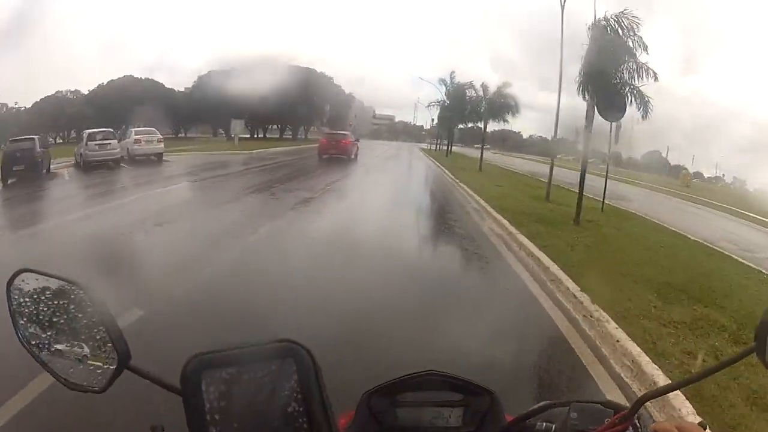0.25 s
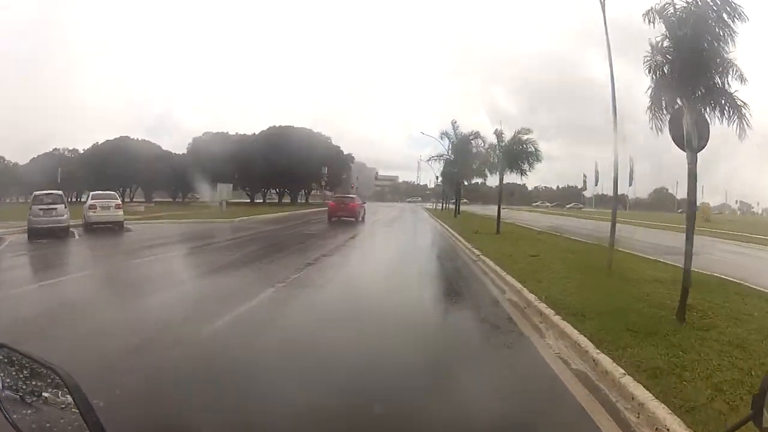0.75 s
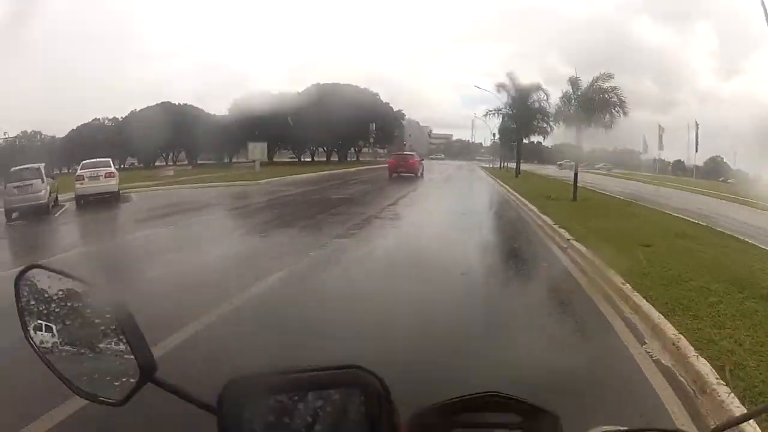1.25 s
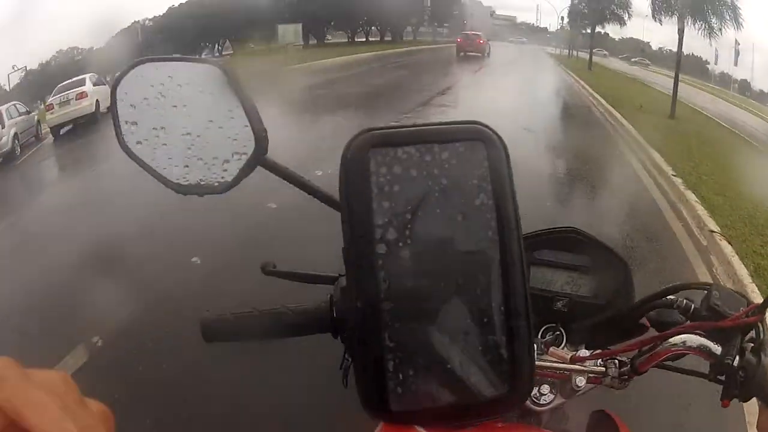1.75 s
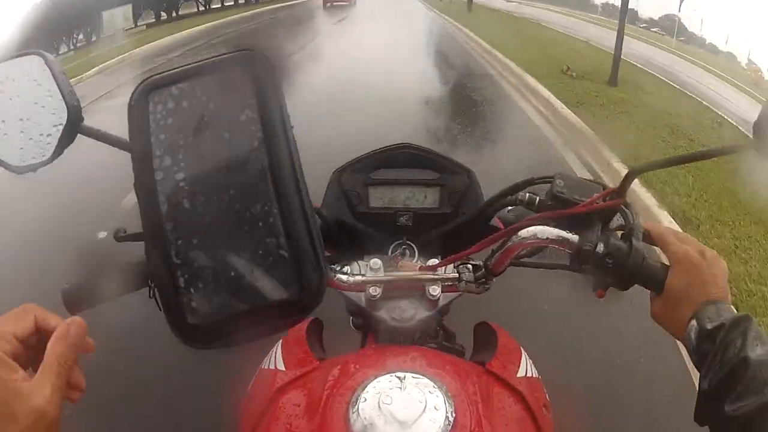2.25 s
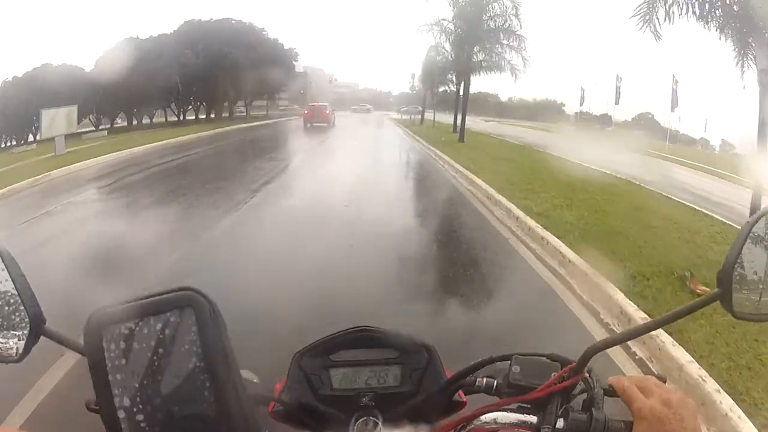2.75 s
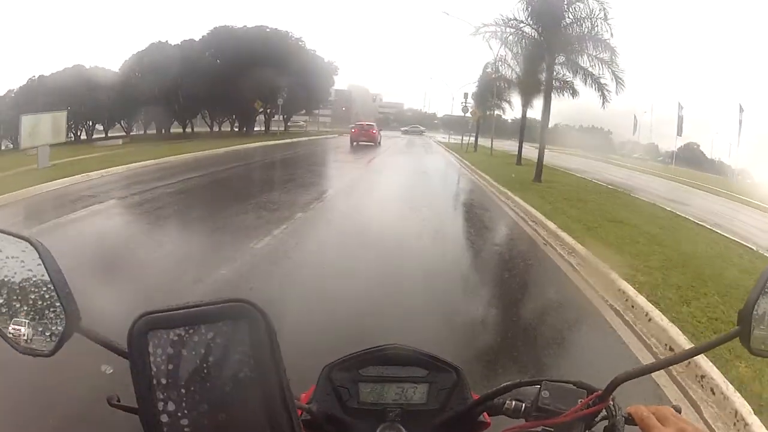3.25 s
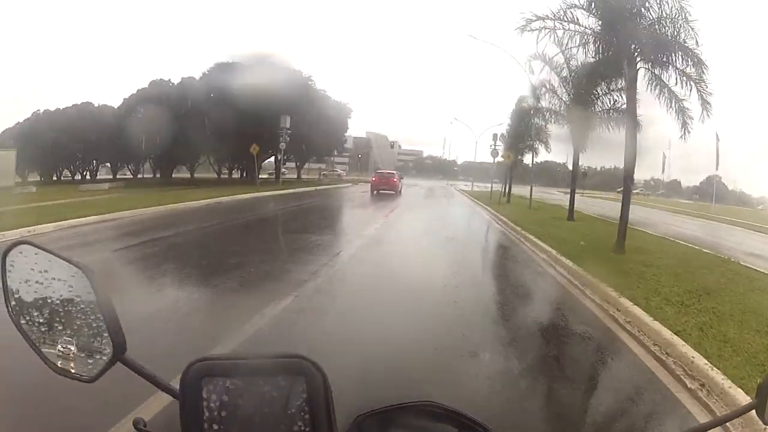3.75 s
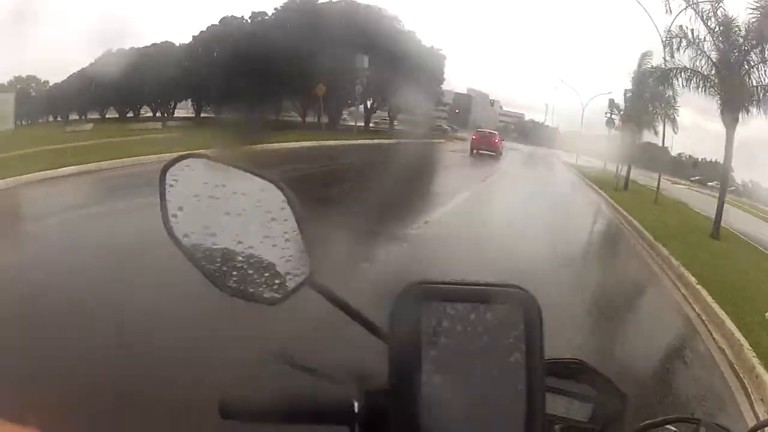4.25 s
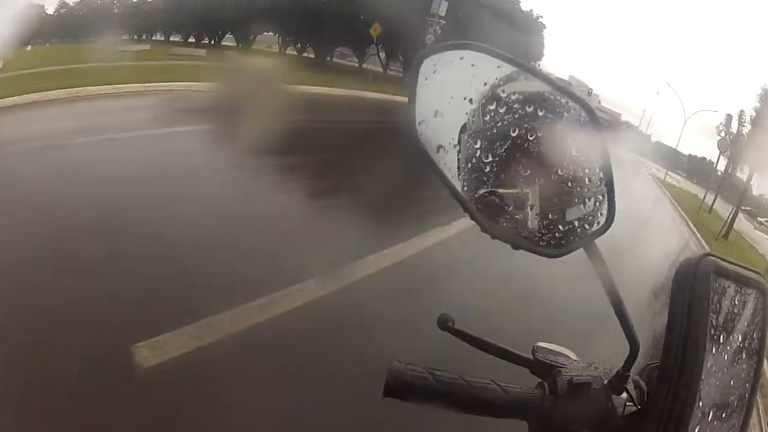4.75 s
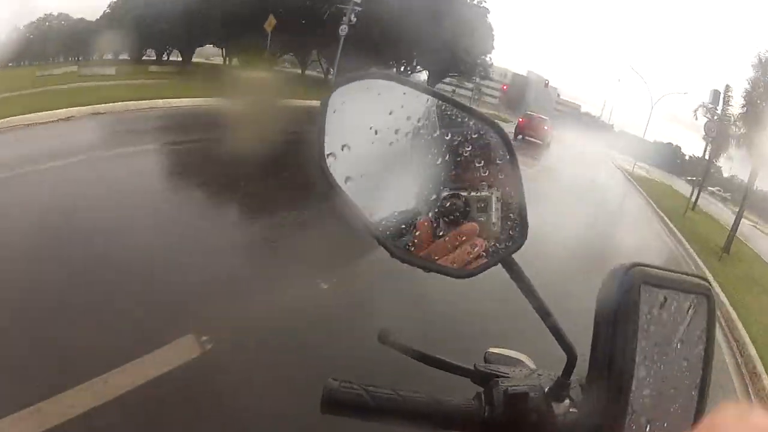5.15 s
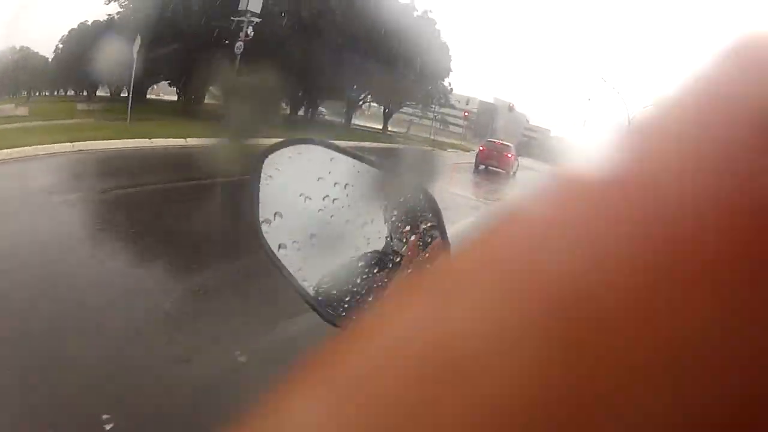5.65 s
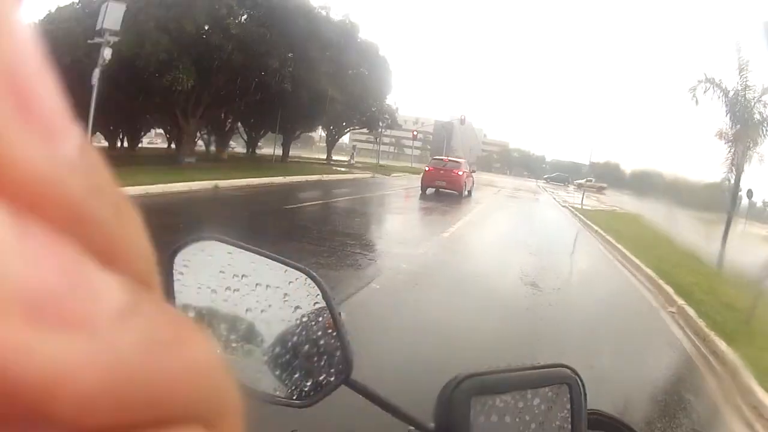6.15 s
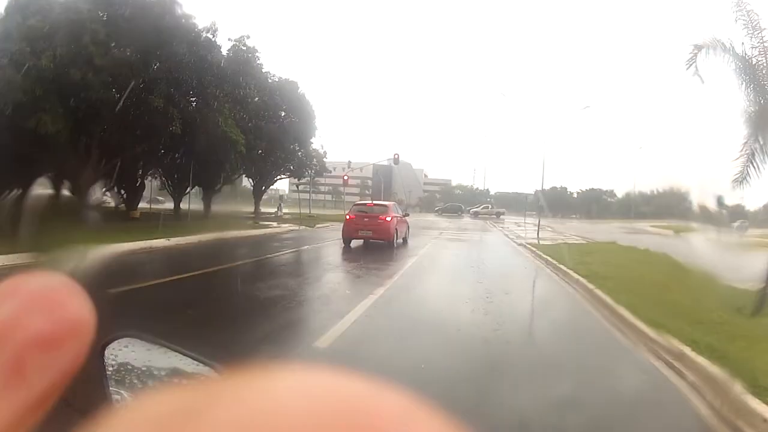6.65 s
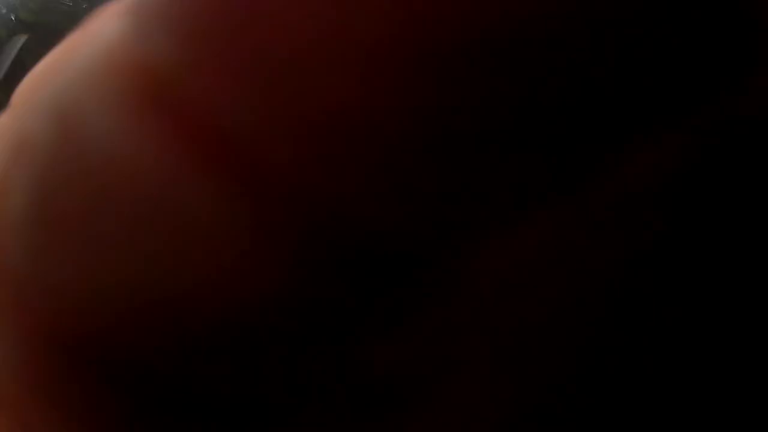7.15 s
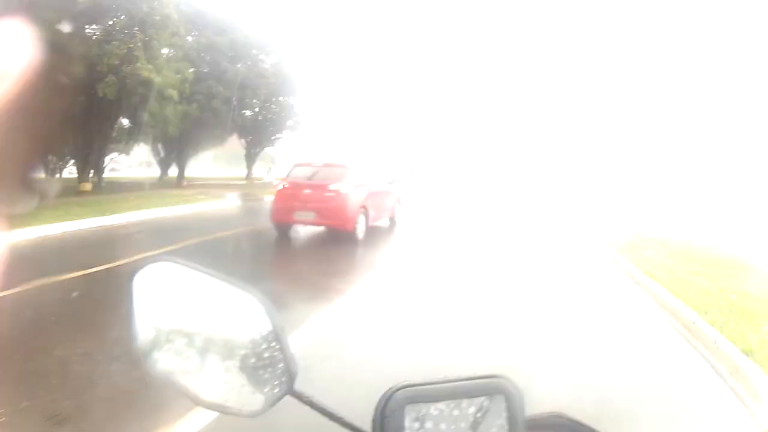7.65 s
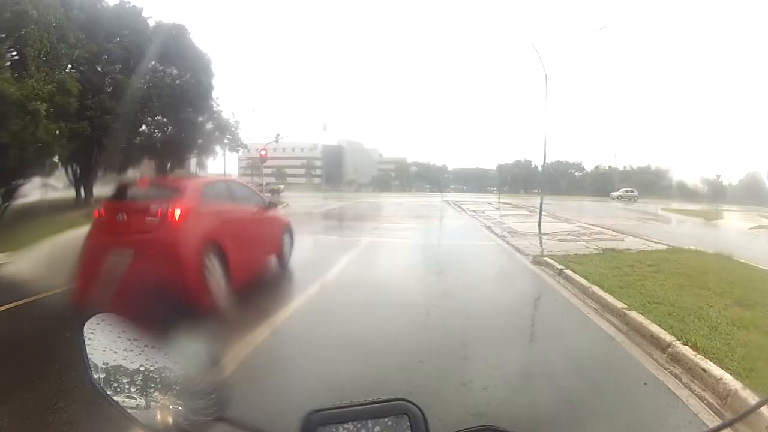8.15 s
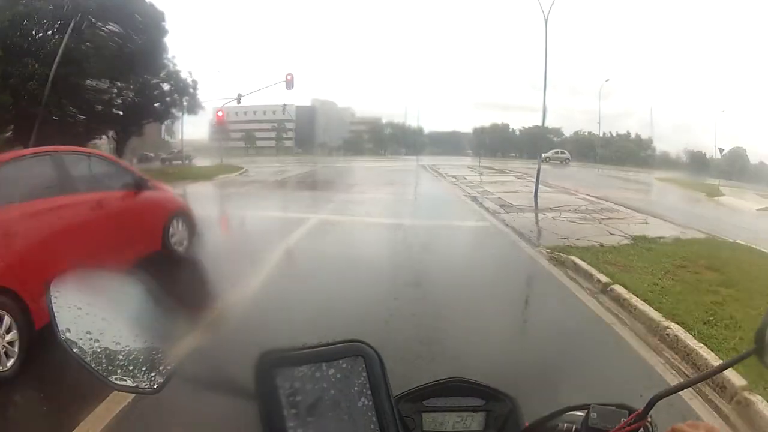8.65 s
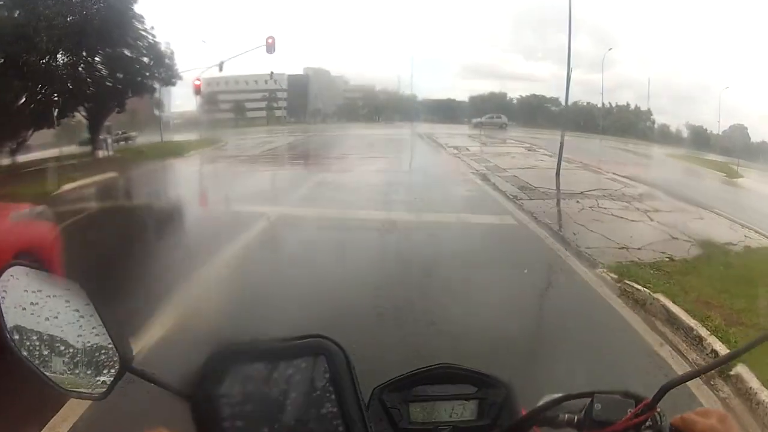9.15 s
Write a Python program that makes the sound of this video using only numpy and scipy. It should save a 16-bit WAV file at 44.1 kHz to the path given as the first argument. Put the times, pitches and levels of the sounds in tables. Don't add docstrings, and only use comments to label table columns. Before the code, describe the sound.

Boxy, close rain knocks on a sealed housing over muffled road wash and low wind; a wet finger rubs hard, then brakes squeal thinly.

```python
import sys
import numpy as np
from scipy import signal
from scipy.fft import rfft, irfft, next_fast_len
from scipy.io import wavfile
from scipy.ndimage import uniform_filter1d

SR = 44100
rng = np.random.default_rng(int(sys.argv[2]) if len(sys.argv) > 2 else 0)


def volts(x):
    e = np.asarray(x, float) / 20
    return 10 ** e


def output_pcm(signal):
    pcm = np.clip(np.atleast_2d(signal).T, -1, 1) * 32767
    wavfile.write(sys.argv[1], SR, np.round(pcm).astype(np.int16))


N = 414099

# (time [s], level [dB])
HISS = [(0.0, -48.5), (2.12, -48), (3.24, -46), (7.5, -48.5), (7.71, -52), (9.39, -55)]
# (frequency [Hz], width [Hz], level [dB])
HISS_PEAKS = [(630, 440, -36), (998, 26, -7), (1331, 91, 5), (1847, 260, 0.5), (2405, 320, -1.5),
              (2770, 910, -12.5), (3640, 160, -4), (4700, 1200, -30), (5400, 900, -66)]
# (time [s], level [dB])
WIND = [(0, -37.5), (.9, -52.5), (1.3, -50), (1.45, -53.5), (2.8, -54), (3.5, -50), (4.3, -50.5),
        (4.75, -53.5), (4.85, -46), (5.1, -50), (7.5, -52), (7.65, -51), (8.5, -58), (9.39, -61.5)]
DEEP_DB = 1.5
SELF_NOISE_DB = -63

# (frequency [Hz], level [dB], t60 [s])
HOLLOW = [(420, -19, .015), (650, -2, .024), (820, -5, .018), (990, 0, .022)]
DOOR = [(1265, 0, .024)]
WALLS = [(1680, -5, .013), (1900, -5, .012), (2280, -2, .013), (2460, 0, .011), (2820, -4, .01)]
BRIGHT = [(3350, -3, .009), (3680, -1, .009), (4200, -10, .007), (4700, -11, .008), (5300, -17, .006)]

# (centre time [s], peak [dB], frequency [Hz])
BUFFETS = [(.01, -13, 85), (0.175, -20.5, 199), (0.18, -26, 83), (.278, -21, 198), (.485, -25.5, 63.6),
           (0.514, -30, 81), (0.552, -29.5, 153), (0.933, -24.5, 151), (1.088, -19.5, 90), (1.25, -32, 25),
           (1.299, -26.5, 25), (3.287, -30.5, 190), (3.391, -27, 53), (3.644, -32, 35), (3.757, -31, 40.8),
           (3.825, -32, 27.6), (3.998, -33.5, 203), (4.111, -31, 126), (4.158, -31, 122),
           (4.478, -30, 54.4), (5.384, -29, 274), (6.325, -32.5, 54.3), (6.821, -29, 27.8),
           (6.833, -28.5, 164), (8.98, -32.5, 203)]
# (centre time [s], peak [dB], frequency [Hz])
THUMPS = [(0.375, 6.5, 137), (.654, -27, 290), (.803, -16, 286), (0.874, -16, 156), (1.3617, -7, 320),
          (2.109, -35.5, 236), (3.547, -20.5, 219), (3.954, -25, 118), (4.8703, -3.5, 182),
          (5.86, -30, 287), (5.988, -29, 298), (6.177, -23.5, 280), (6.533, -31.5, 234),
          (6.651, -26.5, 294), (8.283, -34.5, 196), (9.138, -26.5, 227), (4.216, -28, 352),
          (9.137, -37, 80.4)]
# (centre time [s],
# peak [dB], frequency [Hz])
BUMPS = [(0.29, -21, 84.6), (0.342, -21, 94), (.82, -17, 187), (.841, -25.5, 68), (0.903, -22, 56),
         (4.924, -20.5, 131), (4.97, -31, 104), (5.747, -13.5, 70), (5.77, -10, 160), (5.786, -12, 43.8),
         (5.801, -14, 282), (6.069, -13.5, 170), (6.107, -23, 120), (6.723, -13.5, 108), (6.736, -15, 34.3),
         (6.754, -21, 59), (7.569, -22.5, 189), (7.63, -27.5, 103), (7.596, -24, 213), (.81, -22, 330),
         (0.831, -23, 170), (.869, -21, 201), (4.89, -13.5, 110)]

# (time [s], peak [dB], hollow knock re peak [dB], bright tick re peak [dB], hollow tilt [dB per octave])
KNOCKS = [(.374, 3.5, 3, 0.5, -0.5), (0.8, -14.5, 5, -21, -4), (0.8742, -31, 7, -19, -17),
          (1.361, 4.5, -16, -8, -18), (2.098, -44, 3, -24, -4), (2.3168, -25.5, 0, 1.5, 49),
          (3.047, -41, 15.5, -22, 43), (3.232, -12.5, -1.5, 3.5, 42), (6.6497, -8, -20, 5.5, -4),
          (4.2135, -11.5, -8.5, -2, 9), (3.541, -18.5, 1, 3.5, -7), (3.9454, -20, -2.5, -2.5, 23),
          (4.869, -9, 9, 4.5, 12), (5.7628, -18, 2.5, -11, 3), (6.042, -18.5, -5, -29, 0),
          (7.1299, -16, -22.5, -1, 3), (7.586, -30.5, 7, -10, -10), (8.277, -44, 7, -22, -2)]
# (time [s], peak [dB], door ring re peak [dB], bright tick re peak [dB])
LENS_DROPS = [(0.0309, -13, -10.5, 1.5), (0.194, -20.5, -17, -4), (0.7719, -17.5, -5.5, -5.5),
              (1.4064, -12.5, -13.5, -10), (1.7518, -13.5, -12, -6), (1.7687, -20, -16, -2),
              (2.3304, -20.5, -19, -8.5), (2.4853, -30, -2.5, -8), (3.6557, -22, -15.5, 0),
              (3.8877, -17.5, -33, -1.5), (4.7015, -22.5, -16.5, -6.5), (4.7672, -15, -20, -6.5),
              (4.801, -22.5, -12, -7), (4.834, -25, -15, -4), (5.1029, -14.5, -13, -1.5),
              (5.239, -14, -14, -41), (5.6968, -9.5, -26, -11), (5.996, -18, -13.5, -4),
              (6.1762, -9, -12, 1.5), (6.4306, -20.5, -16, -6.5), (8.0089, -21, -8, -8.5),
              (8.1404, -12, -21.5, -8), (8.9434, -12.5, -17, -11), (9.2045, -27, -12, -1.5),
              (9.138, -11, -14.5, -6.5)]
# (time [s], peak [dB], door ring re peak
# [dB], bright tick re peak [dB])
TOP_DROPS = [(0.3005, -9, -14, -2), (0.6515, -11, -15.5, -2), (0.838, -11, -12, 1.5),
             (0.9886, -15, -18.5, -5.5), (1.1321, -17, -18, -8.5), (1.6587, -24.5, -25, -13),
             (1.699, -20.5, -14, -5.5), (2.8722, -15, -10.5, -4.5), (2.881, -12, -17.5, -10),
             (3.2286, -12, -6, -33), (3.3132, -17, -12, -7), (3.8107, -17, -13, 1.5),
             (4.076, -25.5, -10.5, -1.5), (5.319, -24, -10.5, -6), (6.1653, -20, -3.5, -8),
             (6.5303, -22.5, -10, -12), (7.5721, -21.5, -12, -5), (7.6146, -22, -19, -0.5)]
# (time [s], peak [dB], door ring re peak [dB], bright tick re peak [dB])
MOUNT_DROPS = [(0.7125, -26.5, -6, -9), (1.181, -28.5, -0.5, -12), (2.0936, -32, -1.5, -17),
               (2.16, -38, -26, -16), (2.4067, -35.5, -28, -3), (2.9313, -26.5, -24, -20),
               (3.3294, -43, -14, -15), (4.3247, -16, -15, -28), (4.4968, -23, -22, -18),
               (5.1735, -26.5, -13, -16), (5.2277, -21.5, -24, -1), (5.7145, -10, -20, -18),
               (5.8595, -9.5, -15.5, -39), (6.9292, -29.5, -14, -11), (7.126, -21, -9, -21),
               (7.547, -29.5, -17, -15), (8.3405, -21.5, -24, -11), (9.1828, -23.5, -20, -23)]
SPOT_HOLLOW_DB = [-25, -24, -25]
DOOR_DB, TICK_DB = 7, 6
# (time [s], peak [dB])
VISOR_SPLATS = [(0.5174, -32), (0.57, -27.5), (0.6675, -28), (0.7345, -30), (1.4416, -26), (1.552, -30.5),
                (2.013, -55), (2.2482, -31.5), (2.7828, -28), (2.983, -28), (3.045, -35.5), (3.12, -29),
                (3.4392, -33), (3.692, -30), (3.91, -35), (5.0285, -26.5), (5.544, -27.5), (5.5772, -34.5),
                (5.821, -36), (5.965, -33.5), (6.5675, -27), (6.596, -37), (6.7168, -35.5), (7.8297, -35),
                (8.0904, -35), (8.7603, -32.5), (9.097, -32)]
# (time [s], peak [dB])
SHELL_SPLATS = [(0.155, -42), (0.168, -34), (0.753, -36), (.797, -39), (0.857, -42), (1.27, -38.5),
                (1.469, -29.5), (1.582, -33.5), (1.736, -41), (1.805, -42), (1.8974, -35), (2.203, -31),
                (3.0575, -38.5), (3.154, -33), (3.5194, -26.5), (3.572, -32.5), (4.906, -23), (4.9699, -36),
                (5.073, -34), (5.119, -33.5), (5.189, -33), (5.5599, -30.5), (5.745, -29.5), (5.81, -31.5),
                (5.914, -34.5), (6.78, -64), (6.858, -47), (6.968, -29.5), (6.984, -28), (6.999, -28.5),
                (7.032, -30.5), (7.077, -27.5), (7.9847, -35.5), (8.106, -31.5), (8.191, -34),
                (9.004, -32.5)]
# (time [s], peak [dB])
BACK_SPLATS = [(.006, -24.5), (0.283, -29), (0.398, -41), (0.542, -32), (1.094, -35.5), (2.219, -31),
               (2.7084, -37), (2.8123, -34), (3.279, -32), (3.475, -32.5), (3.748, -31.5), (3.78, -25.5),
               (3.8443, -28), (3.898, -35), (3.988, -35), (4.114, -30), (4.276, -32), (4.739, -35),
               (4.7532, -33), (5.381, -35.5), (5.424, -34), (5.483, -38), (5.985, -37), (6.206, -42),
               (6.458, -49), (6.5206, -34), (6.627, -34.5), (7.101, -47), (7.3446, -35), (8.279, -57)]
# (bright tick re peak [dB], spreading time [ms])
SPLAT_KIND = [(3, 1.9), (-10, 3.2), (-19, 3.2)]

# (time [s], peak [dB], bright tick re peak [dB])
PATTER = [(0.108, -35, -15), (0.155, -28.5, -22), (0.24, -34, -16.0), (0.33, -31, -22.0),
          (0.35, -31.5, -18.0), (0.398, -25, -24), (0.693, -41, -10.0), (0.932, -39, -16),
          (1.034, -46, -16.0), (1.332, -42, -13.0), (1.498, -34.0, -11), (1.567, -40, -16), (1.737, -30, 1),
          (1.958, -35, -7), (2.01, -31, -21), (2.195, -41, -18.0), (2.415, -40, -3), (2.513, -39, -6),
          (2.615, -32.5, -8), (2.676, -45, -9), (2.709, -32, -19), (2.952, -38, -10.0), (3.189, -36.5, 8.5),
          (3.367, -37, -10), (3.681, -33.0, -11.0), (4.15, -30.5, -4), (4.344, -43, -10.0),
          (4.384, -44, -14), (4.824, -31, -12.0), (4.944, -40, -6), (5.212, -32.0, -7), (5.256, -30.5, -11),
          (5.442, -32, -14.0), (5.799, -30, -12), (5.914, -39, -13), (6.359, -41, -13), (6.416, -34, -16),
          (6.46, -30.5, -24), (6.51, -49, -14.0), (6.782, -29, -15), (6.872, -45, -13), (7.093, -37, -16.0),
          (7.102, -35, -18.0), (7.284, -38.5, -12), (7.331, -36.0, -10.0), (7.651, -39, -10),
          (8.275, -30.5, -17), (8.449, -37.5, -7), (8.731, -36.5, -13.5), (8.802, -41, -18),
          (9.381, -33, -18)]
# (time [s], peak [dB], bright tick re peak [dB])
MORE_PATTER = [(0.29, -42, -22), (.49, -37, -12), (7.975, -36, -14), (7.992, -43, -16), (8.152, -28.5, -14),
               (8.178, -32, -14), (8.201, -32.5, -18), (1.193, -33, -8), (8.611, -37, -1.5), (8.84, -36, -3),
               (3.213, -33, -18), (3.262, -36, -14), (2.151, -45, -14), (2.76, -41, -16), (6.821, -40, -21)]
PATTER_MS = 2
# (time [s], level [dB])
RUNOFF = [(0.38, -14), (.803, -22.5), (.871, -27), (3.544, -33), (4.873, -27), (7.585, -32), (7.618, -35.5)]
RUNOFF_T60_S = 0.073

# (time [s], slip rate [per s], wall swing [dB], rasp [dB])
WIPES = [
    [(6.0495, 414, -18.5, -9), (6.06, 397, -20.5, -12.5), (6.068, 225, -22, -16), (6.076, 257, -21, -15.5),
     (6.081, 354, -16, -13), (6.097, 330, -20, -14), (6.103, 290, -15.5, -18.5), (6.11, 400, -23.5, -15),
     (6.162, 570, -65, -28)],
    [(6.9597, 210, -30, -58), (6.975, 230, -37, -46), (6.985, 192, -31, -40), (7.005, 225, -29.5, -38),
     (7.015, 164, -27.5, -60), (7.028, 163, -25.5, -34), (7.038, 380, -39, -44)],
    [(7.1205, 120, -21, -46), (7.146, 109, -17, -29), (7.165, 114.5, -9.5, -20.5), (7.195, 129, -2.5, -19),
     (7.203, 212, -4, -23), (7.218, 210, -7.5, -24.5), (7.232, 164, -11, -31.5), (7.256, 250, -34, -40)],
    [(7.358, 315, -31, -38), (7.378, 277, -21, -37), (7.382, 190, -14.5, -16.5), (7.392, 230, -11.5, -12),
     (7.403, 170, -9, -12), (7.411, 140, -8, -11), (7.42, 130, -16, -30)],
    [(7.4225, 176, -7, -3), (7.437, 213, -5, -13.5), (7.455, 179, -5, -9.5), (7.474, 160, -7, -15.5),
     (7.482, 204, -9, -15), (7.497, 260, -17, -25), (7.505, 208, -18.5, -26.5), (7.535, 230, -41, -62)],
]
# (frequency [Hz], level under fingertip [dB], level under pad [dB], t60 [s])
RASP = [(734, 2.5, -12, 0.015), (1000, 3, -1.5, 0.025), (1304, 0, 4.5, 0.014), (1614, 2.5, -2.5, 0.0093),
        (1865, -8, -4, 0.012), (2476, -2, 0.5, 0.0086), (2915, -3, -12.5, 0.019),
        (4800, -6.5, -7.5, 0.0035)]
LEAN = [.6, -.3, -.02, -.8, -.8]
BACK_SLIP = [0.39, 0.38, 0.61, 0.34, 0.58]
DAMPING = 0.78

# (time [s], frequency [Hz], level [dB])
SQUEAL = [(8.918, 3540, -58), (8.938, 3504, -29.5), (8.97, 3550, -34), (9.005, 3554, -22),
          (9.045, 3560, -41), (9.062, 3730, -19.5), (9.085, 3736, -16), (9.095, 3900, -31),
          (9.135, 3850, -44)]
# (time [s], length [s], start frequency [Hz], end frequency [Hz], level [dB])
GRABS = [(9.09, 0.065, 3610, 3660, -33.5), (9.157, 0.097, 3800, 3760, -50.5),
         (9.142, 0.054, 4740, 4740, -40), (9.195, 0.067, 4770, 4700, -48), (9.26, 0.019, 4750, 4850, -47.5),
         (9.281, 0.03, 3660, 3470, -40.5), (9.302, 0.039, 4750, 4700, -61)]
GRAB_EDGE, GRAB_EDGE_DB = 0.24, -9

HOLD_HZ = 12000
GATE_DB, GATE_HZ = -40, 1050


def rms_one(x):
    return x / np.sqrt(np.mean(x ** 2) + 1e-20)


def peak_one(rows):
    return rows / np.abs(rows).max(axis=1, keepdims=True)


def band(x, low_hz, high_hz):
    return signal.sosfilt(signal.butter(2, [low_hz, high_hz], "band", fs=SR, output="sos"), x)


def drift(rate, size=N):
    r = np.exp(-2 * np.pi * rate / SR)
    noise = rng.standard_normal(size + SR)
    return rms_one(signal.lfilter([1], [1, -2 * r, r * r], noise)[SR:])


def fader(table):
    s, level_db = np.transpose(table)
    return volts(np.interp(np.arange(N) / SR, s, level_db))


def ring(x, hz, t60):
    r, w = volts(-60 / (t60 * SR)), 2 * np.pi * hz / SR
    return signal.lfilter([0, np.sin(w)], [1, -2 * r * np.cos(w), r * r], x + 1e-18)


def strike(x, modes):
    return sum(volts(db) * ring(x, hz, t60) for hz, db, t60 in modes)


def glide(rows):
    s, *columns = np.transpose(rows)
    t = np.arange(s[0], min(s[-1], (N - 1) / SR), 1 / SR)
    fade = np.clip(np.minimum(t - t[0], t[-1] - t) / 0.0032, 0, 1)
    return int(s[0] * SR), [np.interp(t, s, c) for c in columns], fade


def place(s, rows):
    out = np.zeros(N + 2 * rows.shape[1])
    start = (s * SR).astype(int) % len(out)
    np.add.at(out, start + np.arange(rows.shape[1]), rows)
    return out[:N]


def splash(s, splash_ms, levels_db, slap_db, tilt_db):
    ms = np.arange(2048) / SR * 1e3
    luck = rng.standard_normal((len(s), len(ms) + 20))
    spread = ms / (splash_ms * volts(1.5 * np.clip(luck[:, -1:], -1.5, 1.5)))
    push = luck[:, :len(ms)] * np.exp(-spread ** 0.78) * np.clip(ms / 0.18, 0, 1)
    hit = volts(levels_db[0] + slap_db) * peak_one(band(band(push, 1530, 3160), 1390, 3410))
    z = np.exp(-2j * np.pi * np.arange(1025) / 2048)
    # modes, shift of pitch with the spot, top of the band [Hz], tilt
    groups = [(WALLS, .025, 3300, 0), (BRIGHT, .02, 4800, 0), (HOLLOW, .015, 1300, tilt_db), (DOOR, .012, 3000, 0)]
    for level_db, (modes, shift, top_hz, tilt) in zip(levels_db, groups):
        sound = 0
        for k, (hz, db, t60) in enumerate(modes):
            r = volts(-60 / (t60 * SR))
            w = 2 * np.pi * hz / SR * (1 + shift * luck[:, [-2 - k]])
            resonance = (1 - z * z) / (1 - 2 * r * np.cos(w) * z + r * r * z * z)
            rung = irfft(rfft(push) * resonance)
            mode_db = db + tilt * np.log2(hz / 800) + 2 * luck[:, [-10 - k]]
            sound = sound + volts(mode_db) * peak_one(rung)
        hit = hit + volts(level_db) * peak_one(band(sound, max(top_hz / 5, 450), top_hz))
    return place(s, hit)


def hiss(per_s=250):
    wash, spray_db = 0, 1.8 * drift(40)
    for hz, width, db in HISS_PEAKS:
        r = np.exp(-np.pi * width / SR)
        poles = [1, -2 * r * np.cos(2 * np.pi * hz / SR), r * r]
        peak = signal.lfilter([1, 0, -1], poles, rng.standard_normal(N))
        wash = wash + (1 - r * r) * volts(db + spray_db + 3.95 * drift(35.0)) * peak
    born = (rng.random(N) < per_s / SR) * volts(5.5 * np.minimum(rng.exponential(1, N), 3))
    splashes = signal.lfilter([1], [1, -np.exp(-1 / (0.007 * SR))], born) * rng.standard_normal(N)
    fine_rain = strike(splashes, DOOR + WALLS) + volts(-54.0) * strike(splashes, BRIGHT)
    return fader(HISS) * rms_one(rms_one(wash) + 0.45 * rms_one(fine_rain))


def wind(lumpy_db=-0.5):
    deep = rms_one(band(rng.standard_normal(N), 5.2, 38) * volts(lumpy_db * drift(25)))
    flutter = band(band(rng.standard_normal(N), 56, 262), 62, 263)
    flutter = rms_one(flutter * volts(lumpy_db * drift(32)))
    return fader(WIND) * (volts(DEEP_DB) * deep + flutter)


def self_noise():
    return volts(SELF_NOISE_DB + 1.5 * drift(25)) * rng.standard_normal(N)


def buffets(rise=0.23, fall=0.86):
    s, peak_db, hz = np.array(BUFFETS + THUMPS + BUMPS).T[:, :, None]
    lead = .04
    turns = (np.arange(6000) / SR - lead) * hz
    shape = np.exp(-np.where(turns < 0, (turns / rise) ** 2, turns / fall))
    phase = rng.uniform(0, 2 * np.pi, s.shape)
    phase[len(BUFFETS):len(BUFFETS + THUMPS)] = -np.pi / 2
    sag = 1 - 0.0098 * np.clip(turns, 0, 5)
    swing = shape * np.sin(2 * np.pi * turns * sag + phase)
    return np.roll(place(s, volts(peak_db) * swing), -int(lead * SR))


def drops():
    rows = [(s, db, hollow_db, tick_db + TICK_DB, 6, door_db + DOOR_DB)
            for table, hollow_db in zip([LENS_DROPS, TOP_DROPS, MOUNT_DROPS], SPOT_HOLLOW_DB)
            for s, db, door_db, tick_db in table]
    rows += [row + (-7.0,) for row in KNOCKS]
    s, peak_db, hollow_db, bright_db, tilt_db, door_db = np.array(rows).T[:, :, None]
    levels_db = [peak_db, peak_db + bright_db, peak_db + hollow_db, peak_db + door_db]
    near = splash(s, 1.0, levels_db, slap_db=-1.0, tilt_db=tilt_db)
    splats = zip([VISOR_SPLATS, SHELL_SPLATS, BACK_SPLATS], SPLAT_KIND)
    rows = [row + kind for table, kind in splats for row in table]
    s, peak_db, bright_db, splash_ms = np.array(rows).T[:, :, None]
    levels_db = [peak_db, peak_db + bright_db, peak_db - 54.0, peak_db - 8.0]
    far = splash(s, splash_ms, levels_db, slap_db=-0.5, tilt_db=17)
    return near + far


def patter():
    s, peak_db, bright_db = np.array(list(PATTER) + MORE_PATTER).T[:, :, None]
    levels_db = [peak_db, peak_db + bright_db, peak_db - 16.5, peak_db - 4.5]
    return splash(s, PATTER_MS, levels_db, slap_db=-25.0, tilt_db=-2)


def runoff(lumpy_db=1.0):
    s, level_db = np.array(RUNOFF).T[:, :, None]
    fall_db = -60 * np.arange(4096) / SR / RUNOFF_T60_S
    noise = rng.standard_normal((2, len(s), len(fall_db)))
    low = rms_one(band(band(noise[0], 280, 1460), 300, 1700))
    high = rms_one(band(band(noise[1], 1000, 2600), 1000, 2600))
    gurgle = volts(level_db + fall_db) * (low + volts(fall_db - 2.0) * high)
    return place(s, gurgle) * volts(lumpy_db * drift(150))


def finger():
    out = np.zeros(N)
    for k, (rows, back, lean) in enumerate(zip(WIPES, BACK_SLIP, LEAN)):
        damped = [(hz, pad_db if k else tip_db, t60 * DAMPING) for hz, tip_db, pad_db, t60 in RASP]
        at, (rate, body_db, rasp_db), fade = glide(rows)
        size = len(rate)
        jitter = .04 + .1 * np.clip(rate / 400 - 1, 0, 1)
        turn = np.cumsum(rate * (1 + jitter * drift(120, size=size))) / SR
        main_slip = np.diff(np.floor(turn), prepend=0)
        far_slip = np.diff(np.floor(turn + .44), prepend=0)
        slip = np.sign(lean) * (main_slip - back * far_slip) * volts(1.8 * rng.standard_normal(size))
        swing = np.interp(turn % 1, [0, .56, 1], [1, -1, 1])
        body = band(swing + 1.0 * swing ** 5 + abs(lean) * swing ** 2, 45, 540)
        grit = .035 * np.maximum(rate / 330, 1) ** 2 * rng.standard_normal(size) * np.exp(-3.5 * (turn % 1))
        scrape = slip + grit
        rasp = band(strike(scrape, damped) + 0.27 * scrape, 800, 6400)
        rasp = band(rasp, 640, 5900 if k == 0 else 4100)
        wipe = np.sign(lean) * volts(body_db) * rms_one(body) + volts(rasp_db) * rms_one(rasp)
        out[at:at + size] += fade * wipe
    return out


def brake():
    out = np.zeros(N)
    edges = [(0, GRAB_EDGE_DB), (GRAB_EDGE, 0), (1 - GRAB_EDGE, 0), (1, GRAB_EDGE_DB)]
    tones = [(SQUEAL, 1)]
    for s, length, hz, end_hz, db in GRABS:
        rows = [(s + length * part, hz + (end_hz - hz) * part, db + edge_db) for part, edge_db in edges]
        tones.append((rows, 1.6))
    for rows, rough in tones:
        at, (hz, level_db), fade = glide(rows)
        wobble_db = rough * .8 * drift(90, size=len(hz))
        hz = hz + rough * 8 * drift(60, size=len(hz))
        tone = np.sqrt(2) * np.sin(2 * np.pi * np.cumsum(hz) / SR)
        out[at:at + len(hz)] += fade * volts(level_db + wobble_db) * tone
    return out


def scene():
    weather = hiss() + wind() + self_noise() + buffets()
    rain = drops() + patter() + runoff()
    return (weather + rain + finger() + brake())[None]


def duck(x, release_db_s=223.0, attack_s=0.012):
    knee_db, share = -18.0, .75
    ramp = release_db_s * np.arange(N) / SR
    power = signal.lfilter([.008], [1, -.992], x ** 2)
    over_db = np.maximum(10 * np.log10(power + 1e-12) - knee_db, 0)
    held_db = np.maximum.accumulate(over_db + ramp, axis=1) - ramp
    r = np.exp(-1 / (attack_s * SR))
    return x * volts(-share * signal.lfilter([1 - r], [1, -r], held_db))


def gated(x, side, edge_hz, gate_db):
    part = signal.sosfiltfilt(signal.butter(6, edge_hz, side, fs=SR, output="sos"), x)
    level_db = 10 * np.log10(uniform_filter1d(part ** 2, size=700) + 1e-12)
    return x - part * np.clip((gate_db - level_db) / 4, 0, 1)


def sample_hold(x):
    carrier = 2 * np.cos(2 * np.pi * HOLD_HZ * np.arange(N) / SR)
    mirrored = x + gated(x, "low", GATE_HZ, GATE_DB) * carrier
    size = next_fast_len(N)
    hz = np.arange(size // 2 + 1) * SR / size
    slope = np.sinc(hz / HOLD_HZ) * volts(np.interp(hz, [15050, 15400], [0, -48]))
    return irfft(rfft(mirrored, size) * slope, size)[:, :N]


def low_pass(x):
    return signal.sosfilt(signal.butter(12, 16520, fs=SR, output="sos"), x)


def record(dry):
    x = signal.sosfilt(signal.butter(10, 5520, fs=SR, output="sos"), duck(dry))
    x = gated(np.clip(x, -.7, .7), "high", 4400, -71)
    mix = np.clip(sample_hold(x), -.72, .72)
    return low_pass(mix)


dry = scene()
out = record(dry)
output_pcm(out)
```